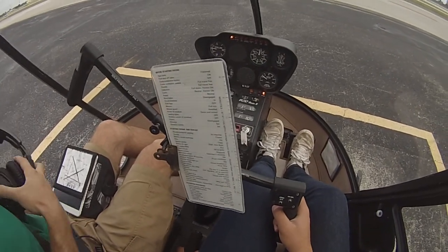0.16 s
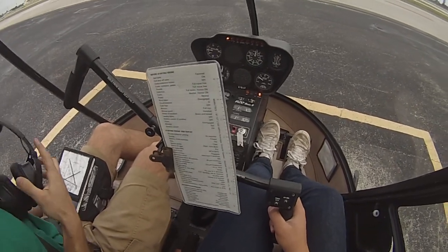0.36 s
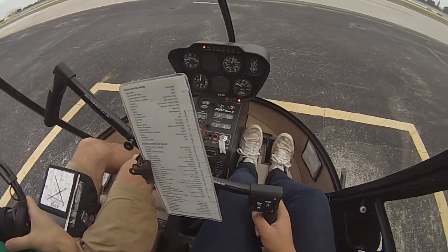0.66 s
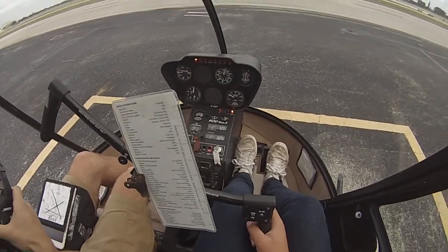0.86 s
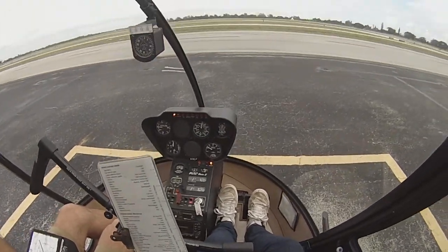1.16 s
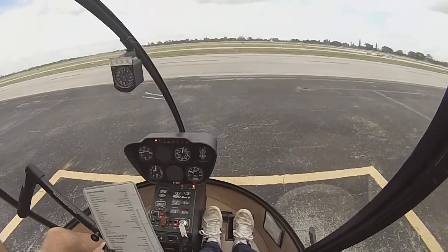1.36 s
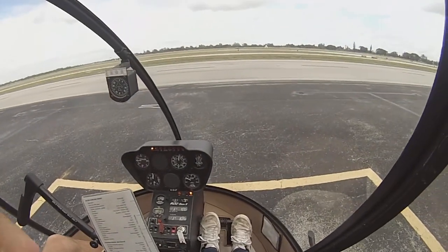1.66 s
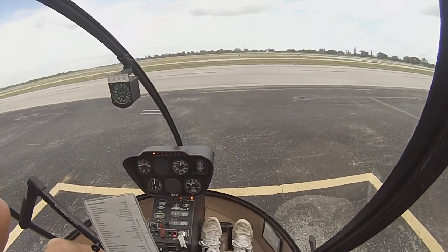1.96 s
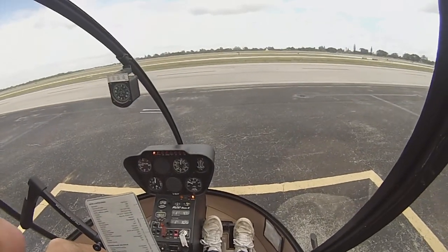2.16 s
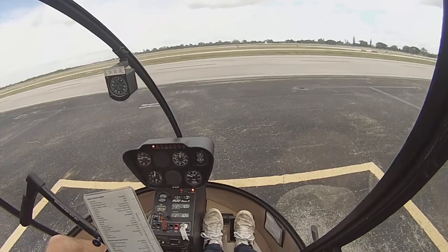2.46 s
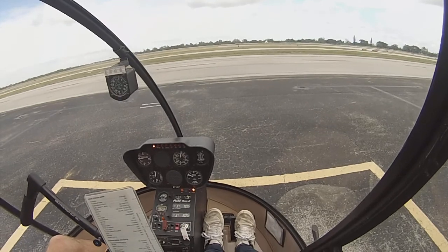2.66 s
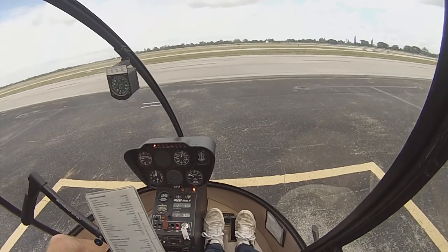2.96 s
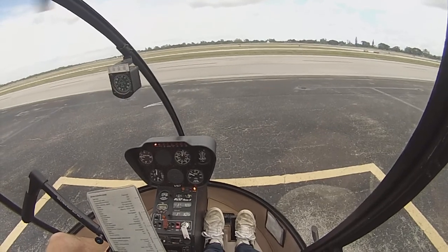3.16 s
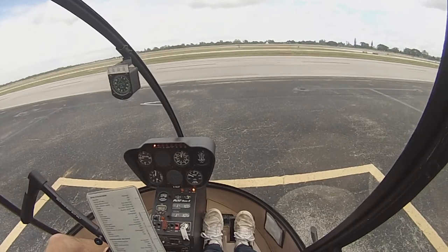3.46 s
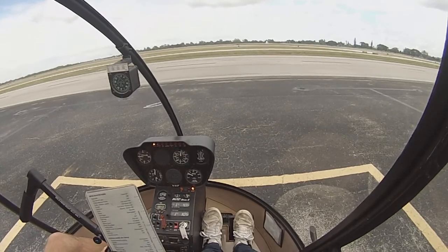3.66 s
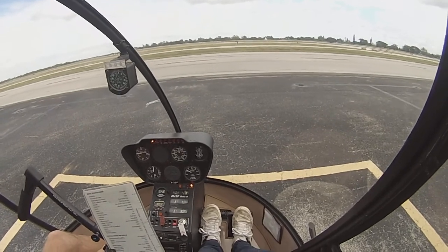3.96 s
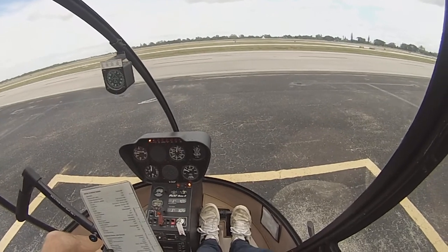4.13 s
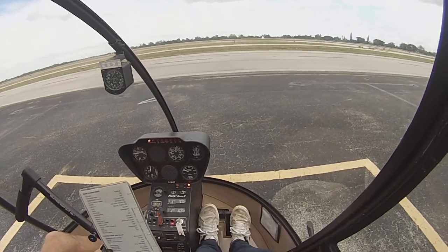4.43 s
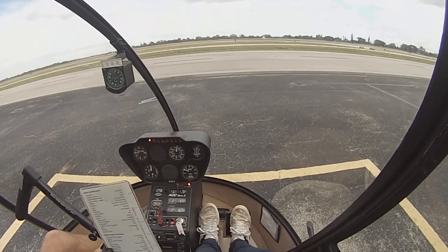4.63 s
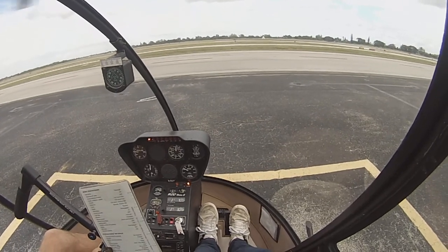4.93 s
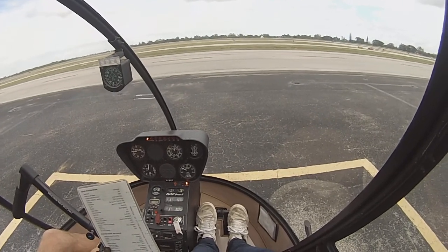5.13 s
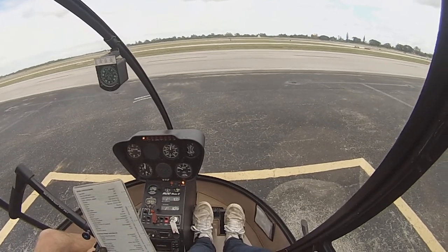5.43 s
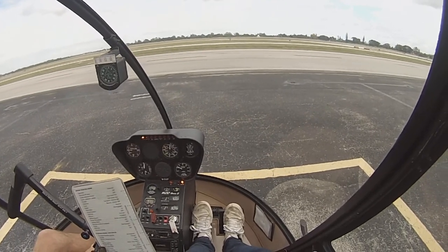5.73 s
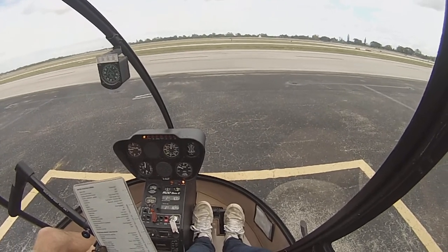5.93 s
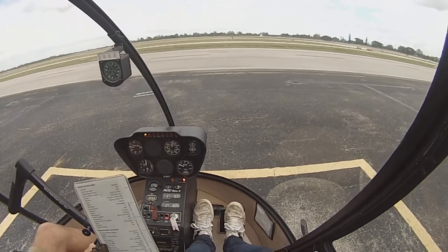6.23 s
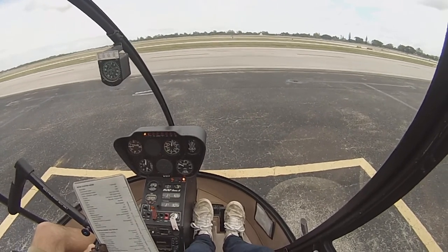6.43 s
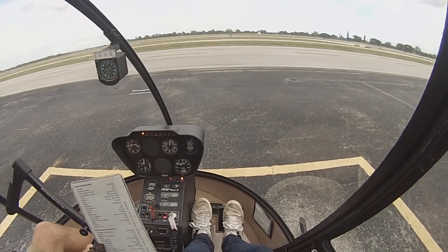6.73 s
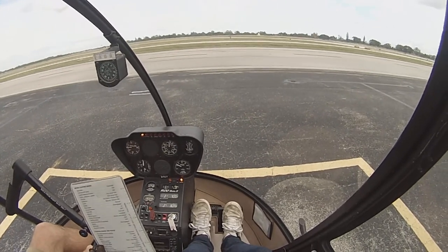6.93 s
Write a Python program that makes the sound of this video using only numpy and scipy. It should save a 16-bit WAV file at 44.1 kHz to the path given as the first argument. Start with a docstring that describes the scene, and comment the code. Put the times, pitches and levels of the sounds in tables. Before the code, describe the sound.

Inside the cockpit of a small helicopter on open tarmac, a four-cylinder piston engine idles with a deep, rapid, slightly uneven throb. Case clatter and cabin panels buzz around it, while two rotor blades swish overhead in turn. Early on the treble softens slightly as the head-worn microphone lifts, a hard part clacks with a soft thud, and a faint tick follows. The idle then carries on unchanged.

```python
"""Small piston helicopter idling, heard from the cockpit

A four-cylinder engine throbs as harmonics of its firing rate; noise bursts ring its case and the cabin panels.
Two rotor blades swish overhead in turn, as hiss through a changing delay, over faint hums and gear whines.
The treble softens once, as the head that carries the microphone lifts from the checklist to the horizon.
Something in the cabin clacks once, then ticks: decaying noise bursts over soft damped thuds."""
import sys
import numpy as np
from scipy import signal
from scipy.fft import rfft, irfft, next_fast_len
from scipy.io import wavfile
from scipy.ndimage import map_coordinates

SR = 44100
rng = np.random.default_rng(int(sys.argv[2]) if len(sys.argv) > 2 else 0)


def inscribe(sig):
    """Save sig as 16-bit PCM at rate SR to the path in sys.argv[1].

    A 1-D sig is mono; a 2-D sig holds one channel per row.
    Samples are clipped to [-1, 1] before scaling.
    """
    pcm = np.round(np.clip(np.atleast_2d(sig).T, -1, 1) * 32767)
    wavfile.write(sys.argv[1], SR, pcm.astype(np.int16))


N = 312669


def amp(db):
    """Level and gain: 20 dB is a factor of ten in amplitude."""
    return 10 ** (np.asarray(db) / 20)


def unit(x):
    """Normalization: scale a signal to rms 1."""
    return x / np.sqrt(np.mean(x ** 2) + 1e-20)


def curves(rows):
    """Linear interpolation: one value per sample for each column after the time."""
    s, *cols = np.transpose(rows)
    return [np.interp(np.arange(N) / SR, s, c) for c in cols]


def wobble(rate):
    """Slow random modulation: a smooth curve through rate random knots a second."""
    knots = rng.standard_normal(int(N * rate / SR) + 4)
    return map_coordinates(knots, [np.arange(N) * rate / SR])


def filtered(x, response):
    """Linear filtering: multiply the spectrum of x by a response of frequency."""
    size = next_fast_len(N + SR // 2)  # zero padding
    spectrum = rfft(x, size) * response(np.fft.rfftfreq(size, 1 / SR))
    return irfft(spectrum, size)[:N]


def noise(points):
    """Coloured noise: rms 1, its spectrum drawn through (f/Hz, level/dB) points."""
    hz, db = np.transpose(points)

    def colour(f):
        return amp(np.interp(np.log(f + 1), np.log(hz), db))

    return unit(filtered(rng.standard_normal(N), colour))


def ring(drive, modes):
    """Modal resonance: noise shaped by drive shakes each mode independently; rms 1 in all."""
    total = np.zeros(N)
    for hz, width, db in modes:
        b, a = signal.iirpeak(hz, hz / (1.5 * width), SR)  # two passes narrow this to about width
        shaken = drive * rng.standard_normal(N)
        once = signal.lfilter(b, a, shaken)
        total += amp(db) * signal.lfilter(b, a, once)
    return unit(total)


def strokes(cycle, place, rise, fall, scatter_db):
    """Periodic impulsive excitation: unequal bursts peak at place, rising and falling over parts of a cycle."""
    since = cycle - place + rise + 2
    sizes = amp(scatter_db * rng.standard_normal(1024))
    age = since % 1
    return sizes[since.astype(int)] * np.minimum(age / rise, np.exp(-(age - rise) / fall))


def with_head(bowed, raised):
    """Receiver motion: a value glides from bowed to raised as the head lifts."""
    middle_s, length_s = 1.24, 0.88
    move = np.clip((np.arange(N) / SR - middle_s) / length_s + .5, 0, 1)
    return bowed + (raised - bowed) * np.sin(np.pi / 2 * move) ** 2


def head_gain(bowed_db, raised_db):
    """Position-dependent level: the gain of one part as the head lifts."""
    return amp(with_head(bowed_db, raised_db))


def whines(crank):
    """Periodic meshing and rotation: belts, rotors and gears sound at multiples of crank speed, as belts flex."""
    # hums of belt, blades and tail rotor, then gear whines [multiple of crank speed]
    whine_multiples = [2.18, 2.394, 2.56, 14.95, 20.5, 30.1, 63, 66.8, 77.8, 110.5]
    # rms of each of these tones [level/dB]
    whine_levels = [-48.5, -52, -47.5, -57, -55, -65, -63.5, -61.5, -62, -69]
    total = np.zeros(N)
    for k, db in zip(whine_multiples, whine_levels):
        phase = k * (crank + 0.01 * wobble(8)) + rng.random()
        wavering = amp(2.8 * wobble(10)) * np.cos(2 * np.pi * phase)
        total += amp(db) * unit(wavering)
    return total


def hub_rush():
    """Turbulence noise: air over the rotor hub gives a steady broadband rush."""
    # colour of the hub's rush [f/Hz, relative level/dB]
    hub_colour = [(3000, -16), (7000, -13), (8200, -9.5), (9000, -2.5), (10500, -5), (12000, -7),
                  (13500, -13), (14400, -23), (15200, -16)]
    return amp(-62.5) * noise(hub_colour)


def blade(turn, spectrum, place, width, delay_swing_s, dip, lean_db):
    """Doppler effect: a blade's hiss slides in pitch with path length, swells as it nears and dips overhead."""
    angle = (turn - place + .5) % 1 - .5  # turns from overhead
    approach = np.exp(-np.abs(angle / width) ** 3)
    overhead_dip = 1 - dip * np.exp(-(angle / 0.029) ** 2)
    lean = amp(-lean_db * angle / width)  # louder coming than going
    travel = delay_swing_s * SR * np.cos(2 * np.pi * angle)  # changing path length, in samples
    hiss = map_coordinates(noise(spectrum), [np.arange(N) - travel], order=5, mode="mirror")
    return approach * overhead_dip * lean * hiss


def rotor(crank):
    """Amplitude modulation by rotation: two blades of unlike hiss take turns overhead."""
    # colour of the first blade's hiss [f/Hz, relative level/dB]
    first_colour = [(1500, -18), (3000, 7), (4500, -5), (5900, 3.5), (6600, -1), (7800, -3.5), (8900, 6.5),
                    (10500, 4), (11700, 3.5), (12500, -11), (15000, -28)]
    # colour of the second blade's hiss [f/Hz, relative level/dB]
    second_colour = [(1500, -24), (3000, 0), (4500, -2.5), (6000, 1), (8100, -8.5), (8700, 0.5), (9500, 5),
                     (10100, 0.5), (10800, 2.5), (11400, -11), (12500, -17), (15000, -30)]
    turn = crank * .19952  # belt and gearbox ratio
    lean_db = with_head(bowed=5, raised=2.1)
    first = blade(turn, first_colour, place=0.1915, width=0.16,
                  delay_swing_s=0.00098, dip=0.42, lean_db=lean_db)
    second = blade(turn, second_colour, place=.685, width=.148,
                   delay_swing_s=.00079, dip=0.43, lean_db=lean_db)
    return head_gain(-49.5, -52) * (first + amp(-2.5) * second)


def clack():
    """Impact noise: a hard part snaps home in a few quick contacts, and later ticks once."""
    # contacts [t/s, crack level/dB, boost below 3 kHz/dB]
    contacts = [(1.3800, -30.5, 12), (1.3832, -33.5, -5), (1.3862, -33.5, 8.5), (1.392, -39, 0),
                (2.1215, -36, -2)]
    # colour of a crack [f/Hz, relative level/dB]
    crack_colour = [(300, -6), (1000, -5), (1850, 4), (2300, 2.5), (3100, 0.5), (4000, -4), (6400, -4),
                    (7600, -35), (11000, -18), (15000, -34)]
    total = np.zeros(N)
    for s, crack_db, body_db in contacts:
        t = np.maximum(np.arange(N) / SR - s, 0)
        crack = amp(crack_db - 60 * t / 0.034)  # falls 60 dB in 34 ms
        tail = amp(crack_db - 21 - 60 * t / 0.11)  # weaker, falls 60 dB in 110 ms
        colour = [(hz, db + body_db * (hz < 3000)) for hz, db in crack_colour]
        total += (t > 0) * (crack + tail) * noise(colour)
    return total


def thud(s, db):
    """Damped oscillation: the mount under the snapping part gives a few soft swings."""
    pitch_hz, rise_s = 422, 0.005  # rise_s: time to full swing
    t = np.maximum(np.arange(N) / SR - s, 0)
    swing = (t / rise_s * np.exp(1 - t / rise_s)) ** 4
    return amp(db) * swing * np.sin(2 * np.pi * pitch_hz * t)


def engine(crank):
    """Forced resonance: firings puff through the exhaust and, with the valves, rattle case and cabin."""
    # the four firings [place in the cycle/0-1, exhaust level/dB, clatter level/dB]
    cylinders = [(0.198, -5.5, -18), (.455, -4.5, -5.5), (.7, -5.5, -9), (.955, -3.5, 2.5)]
    # resonances of exhaust and cabin air [f/Hz, width/Hz, relative level/dB]
    pipe_modes = [(32.8, 12.4, 3), (55, 30, 0), (101, 18, -5), (129, 35.6, 1), (184.3, 64.4, -4.5),
                  (274, 62, -11)]
    # shell panels shaken by the engine [f/Hz, width/Hz, relative level/dB]
    panel_modes = [(358.7, 82, -0.5), (442, 67, -0.5), (504.8, 34.5, 1), (546, 32, -0.5), (621, 86, -7.5),
                   (1152, 380, -14)]
    # window panes [f/Hz, width/Hz, relative level/dB]
    pane_modes = [(722.5, 57, -1), (832, 160, -3), (923, 110, -1)]
    # engine case and gearbox [f/Hz, width/Hz, relative level/dB]
    case_modes = [(1433, 176, -7.5), (1532, 53, 0), (1633, 87, 0), (1796, 130, -1.5), (1873, 32, -3.5),
                  (1984, 200, -7), (2307, 470, -12.5), (2710, 115, -9), (2963, 193, -7), (3162, 170, -12.5)]
    # thin fittings [f/Hz, width/Hz, relative level/dB]
    fitting_modes = [(3540, 410, 1), (4250, 370, 0), (4800, 210, 0.5), (5440, 420, -4.5), (7080, 410, -7.5)]
    # a high sizzle in the trim [f/Hz, width/Hz, relative level/dB]
    trim_modes = [(5730, 220, -1), (6160, 420, -6)]
    cycle = crank / 2
    puffs = sum(amp(db) * strokes(cycle, place, rise=.03, fall=0.11, scatter_db=1.8)
                for place, db, _ in cylinders)
    knocks = sum(amp(db) * strokes(cycle, place, rise=0.046, fall=0.085, scatter_db=1.0)
                 for place, _, db in cylinders)
    valve_cycle = cycle * 2 * len(cylinders)  # two valves a cylinder
    valves = strokes(valve_cycle, place=0.37, rise=0.092, fall=0.47, scatter_db=2.5)
    taps = knocks + .55 * valves
    shudder = strokes(cycle, place=0.578, rise=0.037, fall=.09, scatter_db=0.7)
    # constants added to the drives are steady shaking between bursts
    exhaust_db = -38.5 - 0.2 * np.arange(N) / SR  # softens 0.2 dB a second as the engine settles
    exhaust = amp(exhaust_db) * ring(puffs + 0.16, pipe_modes)
    shell = head_gain(-47.5, -45.4) * ring(shudder + 1.02, panel_modes)
    windows = head_gain(-50.4, -54) * ring(puffs + .9, pane_modes)
    case = head_gain(-42, -44) * amp(0.54 * wobble(18)) * ring(taps + 2.06, case_modes)
    fittings = head_gain(-56.5, -57.5) * ring(taps + 1.7, fitting_modes)
    sizzle = head_gain(-59, -63.5) * ring(taps + 1.3, trim_modes)
    return exhaust + shell + windows + case + fittings + sizzle


def boom(crank):
    """Harmonic series of a pulse train: two firings a turn, each a steep rise of pressure and a slow fall."""
    # steady exhaust tones [multiple of crank speed]
    tone_multiples = [1, 2, 3, 4, 4.5, 5.5, 6, 8, 10, 11]
    # their strengths [relative level/dB]
    tone_levels = [-20.5, 0, -21, -16.4, -27, -26, -17.5, -27, -29.5, -36]
    # the boom swells for a moment [t/s, length/s, level/dB]
    swells = [(2.88, 0.053, 4), (3.11, .12, 1.8)]
    lope_swing_db, lope_place = 1.05, .74  # unequal cylinders: swing, and where in the cycle (0-1) it peaks
    lag_turns = 0.021  # the boom trails the crank
    belt_per_crank = .183  # laps of the drive belts per crank turn
    tug_db, tug_turns = 0.23, 0.0043  # each lap sways the boom's strength and timing
    t = np.arange(N) / SR
    belt = 2 * np.pi * belt_per_crank * crank
    lope_db = lope_swing_db * np.cos(2 * np.pi * (crank / 2 - lope_place))
    swell_db = sum(db * np.exp(-(2 * (t - s) / length) ** 2) for s, length, db in swells)
    turns = crank - lag_turns + tug_turns * np.sin(belt) + 0.0032 * wobble(4.5)
    tones = np.zeros(N)
    for k, db in zip(tone_multiples, tone_levels):
        offset = rng.random() * (k % 2 > 0)  # only the firing's own overtones line up
        tones += amp(db + 0.15 * k * wobble(7)) * np.sin(2 * np.pi * (k * turns + offset))
    level_db = -25.2 + lope_db + tug_db * np.cos(belt) + swell_db
    return amp(level_db) * unit(tones)


def scene():
    """Superposition: one crankshaft drives engine, whines and rotor; clack and thuds add to them."""
    # engine speed [t/s, crankshaft speed/rpm]
    speed = [(0.0, 1439.5), (1.5, 1441.0), (3.0, 1444.9), (5.0, 1450.5), (7.09, 1452.4)]
    # soft thuds under the clack and the tick [t/s, level/dB]
    thuds = [(1.383, -19), (2.126, -34)]
    rpm, = curves(speed)
    crank = np.cumsum(rpm / 60) / SR  # turns
    machine = whines(crank) + hub_rush() + rotor(crank) + engine(crank) + boom(crank)
    return (machine + clack() + sum(thud(s, db) for s, db in thuds))[None]


def record(dry):
    """Band limitation: the microphone's channel passes nothing from its upper limit on."""
    top_hz = 15250
    return filtered(dry[0], lambda hz: hz < top_hz)[None]


dry = scene()
out = record(dry)
inscribe(out)
```